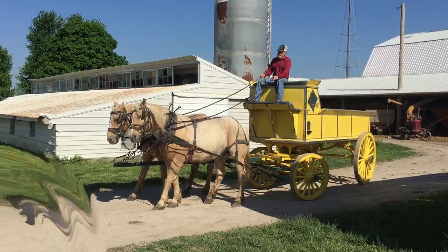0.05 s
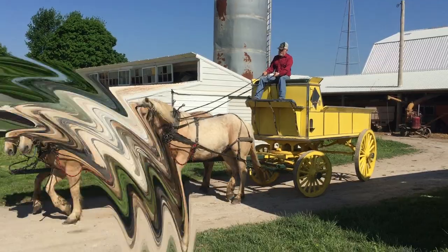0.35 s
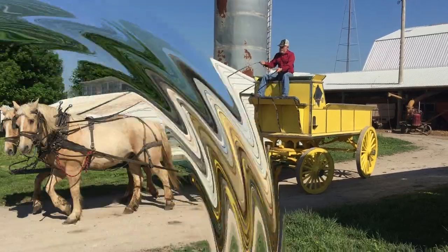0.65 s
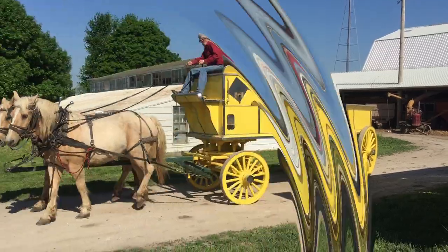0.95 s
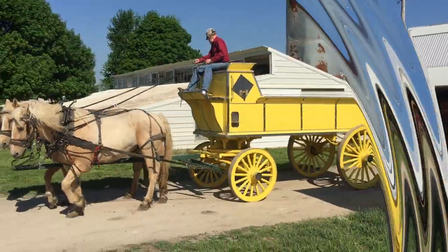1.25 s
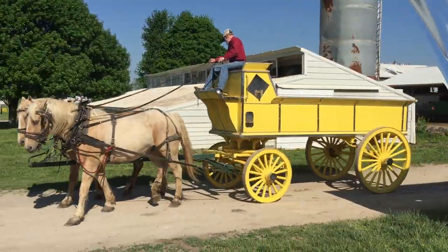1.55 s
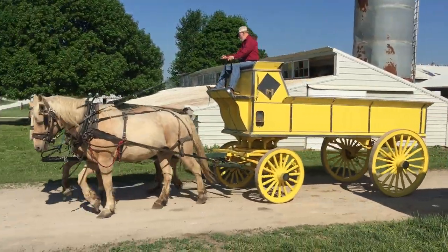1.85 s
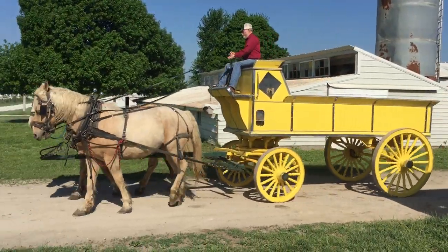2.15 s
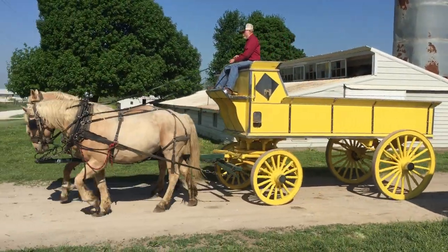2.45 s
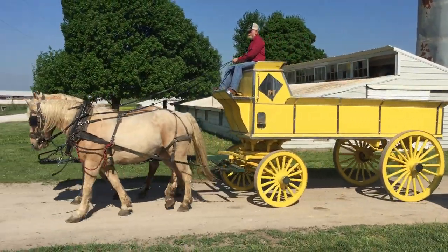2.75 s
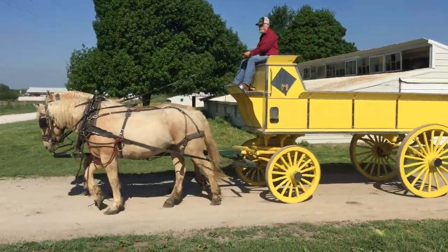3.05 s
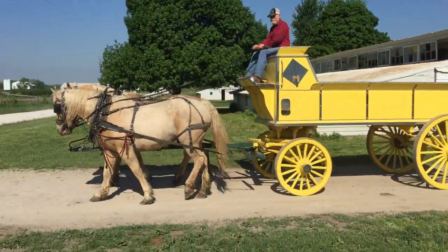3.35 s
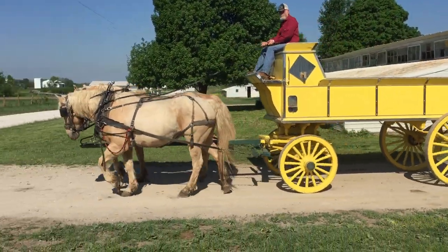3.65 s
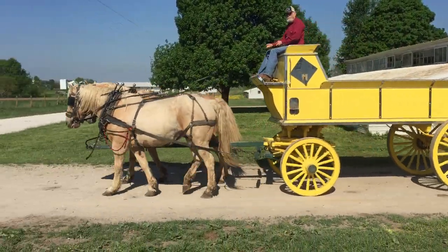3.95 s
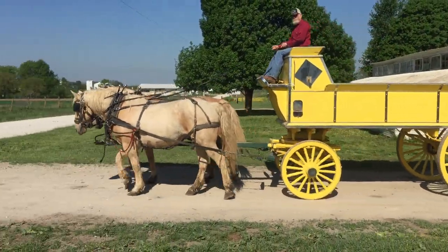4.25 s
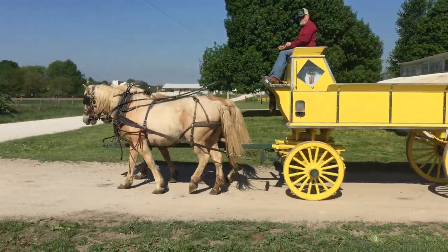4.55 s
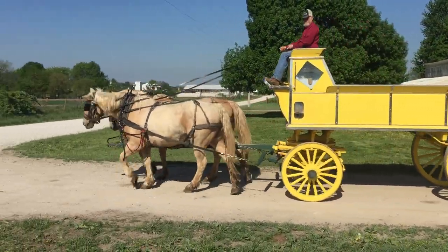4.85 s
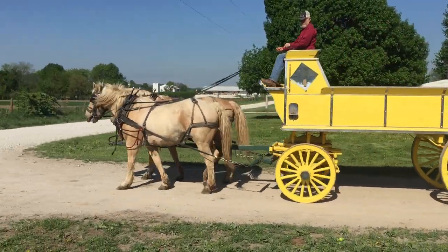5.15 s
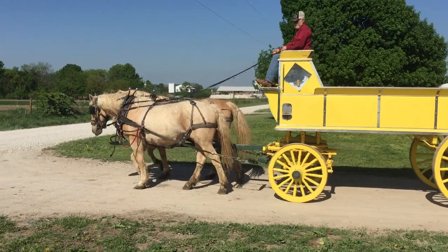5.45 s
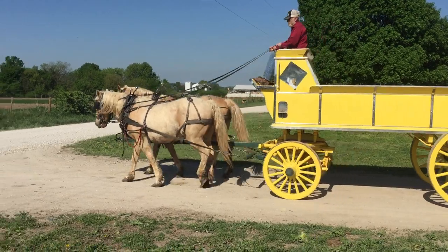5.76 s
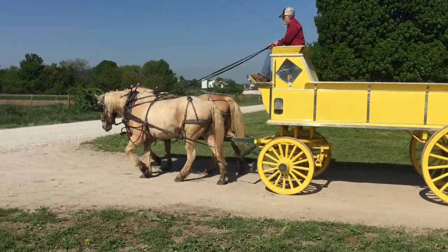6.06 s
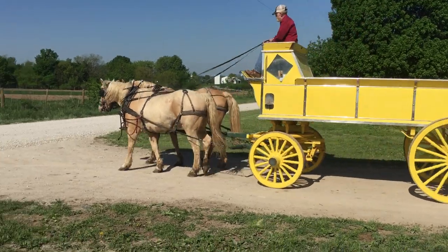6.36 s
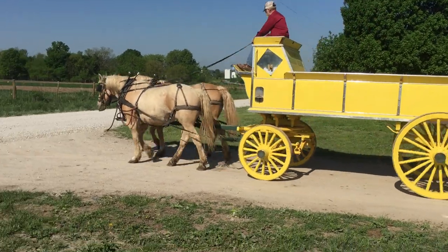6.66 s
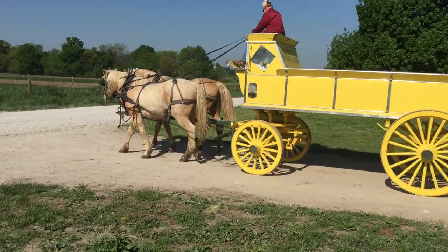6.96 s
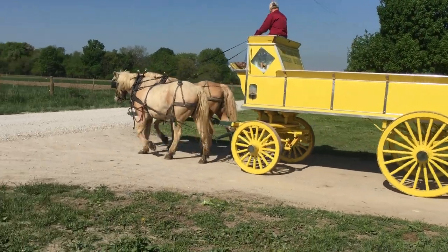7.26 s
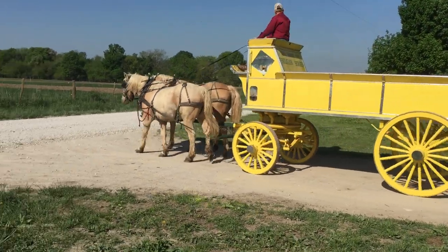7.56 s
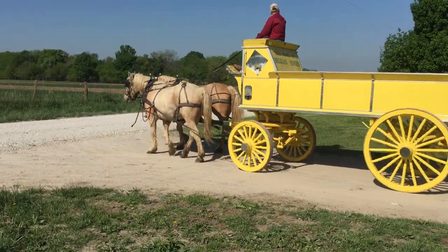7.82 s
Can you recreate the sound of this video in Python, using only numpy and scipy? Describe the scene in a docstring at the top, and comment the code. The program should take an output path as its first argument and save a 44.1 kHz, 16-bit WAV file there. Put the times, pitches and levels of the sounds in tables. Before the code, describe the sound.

Outdoors on a gravel track, wagon wheels start crunching after a short silent moment, along with the hollow clopping of two walking horses. Stones scrape and snap under iron shoes and rims, with occasional thin harness jingles, low knocks and faint sagging hoots. A light breeze buffets the nearby microphone throughout, with the strongest gust and slightly louder crunching at the close.

```python
"""Two heavy horses walk a wooden wagon past on a gravel farm lane.
After 0.8 s of silence, a light wind rumbles on the microphone and the wheels crunch on steadily.
Hooves land with a hollow clop and scuff the stones; larger stones crack under shoes and rims.
Along the way small harness rings tinkle, with short low knocks and a few soft falling hoots.
Near the end, at about 8 s, the wheels grow louder and the strongest gust hits."""
import sys
import numpy as np
from scipy import signal
from scipy.fft import rfft, irfft, next_fast_len
from scipy.io import wavfile

SR = 44100
rng = np.random.default_rng(int(sys.argv[2]) if len(sys.argv) > 2 else 0)


def master(y):
    """Save y as 16-bit WAV."""
    cut = np.clip(np.atleast_2d(y).T, -1, 1)
    pcm = np.round(cut * 32767)  # scale
    wavfile.write(sys.argv[1], SR, pcm.astype(np.int16))


N = 356769
TIME = np.arange(N) / SR
AGE = np.arange(SR // 4) / SR   # seconds since a blow


def from_db(db):
    """Turn decibels into a number to multiply by."""
    return 10 ** (np.asarray(db) / 20)


def rms_one(x):
    """Scale a sound to an average (rms) strength of 1."""
    return x / np.sqrt(np.mean(x ** 2) + 1e-20)


def blow_one(x):
    """Scale a blow to the energy of strength 1 held for 0.02 s."""
    return x / np.sqrt(np.sum(x ** 2) / (.02 * SR) + 1e-20)


def in_time(rows):
    """Join a table's points with straight lines, one curve per level column."""
    s, *columns = np.transpose(rows)
    return [np.interp(TIME, s, c) for c in columns]


def add(out, s, sound):
    """Mix a sound in at s seconds."""
    at = max(round(s * SR), 0)
    out[at:at + len(sound)] += sound[:N - at]


def drift(rate):
    """A slow random wobble that turns about rate times a second."""
    memory = np.exp(-80 * np.pi * rate / SR)
    noise = rng.standard_normal(N // 40 + 2002)   # one value per 40 samples
    slow = signal.lfilter([1], [1, -2 * memory, memory * memory], noise)[2000:]
    return np.interp(np.arange(N) / 40, np.arange(len(slow)), rms_one(slow))


def colour(x, spectrum):
    """Make each pitch louder or softer, following a (pitch [Hz], level [dB]) table."""
    size = 2 * next_fast_len(len(x) // 2 + 2048)
    hz, db = np.transpose(spectrum)
    bins = np.maximum(np.arange(size // 2 + 1) * SR / size, 1)
    gains = from_db(np.interp(np.log(bins), np.log(hz), db))
    cepstrum = irfft(np.log(gains))
    cepstrum[1:size // 2] *= 2   # folded so that nothing sounds ahead of a blow
    cepstrum[size // 2 + 1:] = 0
    return irfft(rfft(x, size) * np.exp(rfft(cepstrum)))[:len(x)]


def fade(rise_s, t60):
    """A blow rises quickly, then dies away; t60 is its fade time, the seconds to drop 60 dB."""
    return (1 - np.exp(-AGE / rise_s)) * from_db(-60 * AGE / t60)


def struck_tone(hz, rise_s, t60):
    """One tone of a struck object; the contact is cushioned, so it starts smoothly."""
    cushion = 1 - np.exp(-AGE / .0005)
    return np.sin(2 * np.pi * (hz * AGE + rng.random())) * fade(rise_s, t60) * cushion


def grains(per_s, spread_db, size=len(AGE)):
    """Stones touch at random moments; most touches are faint, a few are strong."""
    strength = from_db(spread_db * np.minimum(rng.exponential(1, size), 4))
    return (rng.random(size) < per_s / SR) * strength * rng.choice([-1, 1], size)


def pebbles(touches, sharpness):
    """Each touch rings one of 30 stones, each with a pitch of its own."""
    pitches = np.geomspace(450, 8000, 30)
    stone_hit = rng.integers(0, len(pitches), len(touches))
    out = np.zeros(len(touches))
    for stone, hz in enumerate(pitches * rng.uniform(.96, 1.04, len(pitches))):
        b, a = signal.iirpeak(hz, sharpness, fs=SR)
        out += signal.lfilter(b, a, touches * (stone_hit == stone) + 1e-18) / np.sqrt(hz)
    return rms_one(out)


# strength of the breeze: (time [s], level [dB])
BREEZE = [(0.8, -50.5), (2.0, -57), (3.2, -49.5), (3.9, -53.5), (4.5, -49), (5.3, -51), (6.1, -48.5),
          (6.9, -48.5), (8.0, -45.5)]
# gusts hitting the microphone: (time [s], level [dB], fade time [s], pitch [times the usual])
GUSTS = [(4.411, -31.5, 0.22, 1.05), (5.722, -30, 0.13, 1.1), (6.259, -38.5, .1, 1.05),
         (6.927, -32.5, 0.075, 1.6), (7.759, -34.5, 0.12, 1.2), (8.04, -23, 0.22, 1.05)]
# tone of the breeze, of a gust, and of far air and leaves: (pitch [Hz], level [dB])
BREEZE_TONE = [(20, -37), (35, -17.5), (50, 0), (66, 2.5), (90, -6.5), (150, -8), (250, -13), (500, -24.5),
               (2000, -68), (12000, -86.5)]
GUST_TONE = [(25, -21), (50, 6), (75, 7.5), (120, 5), (190, -10), (330, -20), (1000, -47), (8000, -100)]
AIR_TONE = [(20, -35), (40, -12.5), (65, -10.5), (150, -17), (400, -19), (1200, -11.5), (3000, 5.5),
            (6000, -44.5), (15000, -32.5)]

def wind():
    """Wind rumbles on the microphone, with a few sharper gusts and a faint hiss far off."""
    breeze_db, = in_time(BREEZE)
    lumpy_noise = rng.standard_normal(N) * from_db(2.4 * drift(rate=10))
    out = from_db(breeze_db + 5) * rms_one(colour(lumpy_noise, BREEZE_TONE))
    for s, db, t60, ratio in GUSTS:
        tone = [(hz * ratio, level_db) for hz, level_db in GUST_TONE]
        puff = rng.standard_normal(len(AGE)) * fade(0.019, t60)
        add(out, s, from_db(db + 0.5) * blow_one(colour(puff, tone)))
    return out + from_db(-56) * rms_one(colour(rng.standard_normal(N), AIR_TONE))


# echoes from the wagon side and the sheds: (delay [s], level [dB])
ECHOES = [(.013, -19), (.031, -16.5), (.058, -22), (.11, -24)]

def echoes(x):
    """Outdoors only a few dull echoes come back."""
    out = np.zeros(N)
    dull = signal.sosfilt(signal.butter(2, 3500, fs=SR, output="sos"), x)
    for delay_s, db in ECHOES:
        add(out, delay_s, from_db(db) * dull)
    return out


# soft hoots in step with the horses: (time [s], starting pitch [Hz], level [dB])
HOOTS = [(1.113, 222, -36.5), (2.518, 173, -42.5), (2.86, 163.6, -41), (3.149, 180, -36), (3.439, 180, -39),
         (3.729, 186, -37), (6.35, 148, -45)]

def hoots():
    """A soft hollow tone swells and sags in pitch."""
    out = np.zeros(N)
    for s, hz, db in HOOTS:
        pitch = hz * (1 - 0.4 * (1 - np.exp(-AGE / .09)))
        swell = fade(0.013, 0.41) * (1 - AGE / AGE[-1])
        tone = np.sin(2 * np.pi * np.cumsum(pitch) / SR)
        add(out, s, from_db(db) * swell / swell.max() * tone)
    return out


# harness rings touching: (time [s], level [dB], fade time [share of a free ring's])
JINGLES = [(0.7941, -67, 0.8), (1.3444, -48, 0.45), (1.4272, -50, 0.94), (1.5065, -58, 0.59),
           (1.723, -59, 0.74), (1.8504, -58, 1), (1.953, -54, 0.67), (1.9796, -40, 0.64),
           (2.0774, -57, 0.8), (2.36, -58, 1), (2.4304, -61, 0.86), (3.713, -51, 0.95), (4.2068, -55, 0.8),
           (4.682, -56.5, 0.8), (4.7134, -53, 0.72), (5.1407, -65, 0.91), (5.1996, -52.5, 0.8),
           (5.3184, -59.5, 0.8), (5.466, -44, 0.99), (7.143, -53.5, 0.91), (7.2933, -62, 0.89)]
# tones of a freely hanging ring: (pitch [Hz], level [dB], fade time [s])
RING_TONES = [(10310, -19, .3), (10495, -16, .4), (10595, -12, .4), (11530, -13, .3), (11600, -7, .35),
              (11635, -4, .35), (11740, -11, .15), (12160, -10, .3), (12450, -20, .1)]

def harness():
    """A ring is struck with a chink, then rattles four times on its neighbours, fading as it goes."""
    out = np.zeros(N)
    chink_band = signal.butter(3, [10200, 13400], "band", fs=SR, output="sos")
    for s, db, share in JINGLES:
        bounce_times = np.cumsum(0.02 * rng.uniform(.4, 1.6, size=4))
        rattle = [(delay_s, -13.5 - 5.5 * k) for k, delay_s in enumerate(bounce_times)]
        for delay_s, touch_db in [(0, 0.021)] + rattle:
            burst = rng.standard_normal(len(AGE)) * fade(.0004, .04)
            chink = from_db(-20) * blow_one(signal.sosfilt(chink_band, burst))
            ring = np.zeros(len(AGE))
            for hz, tone_db, t60 in RING_TONES:   # each touch mixes the tones anew
                gain = from_db(tone_db - 5 + rng.normal(0, 3.6))
                ring += gain * struck_tone(rng.normal(hz, 18), 0.0016, t60 * share)
            add(out, s + delay_s, from_db(db + touch_db) * (chink + ring))
    return out


# short low knocks: (time [s], level [dB], pitch [Hz])
KNOCKS = [(1.281, -34, 344), (1.37, -35, 398), (1.909, -32, 340), (1.989, -30, 345), (2.076, -29, 358),
          (3.933, -29, 216), (4.269, -28.5, 300), (4.608, -35.5, 299), (5.721, -32.5, 312),
          (7.458, -28.5, 273)]

def low_knocks():
    """Dull, hollow knocks or blips, each one low tone that dies away quickly."""
    out = np.zeros(N)
    for s, db, hz in KNOCKS:
        add(out, s, from_db(db + 5) * struck_tone(hz, rise_s=0.0011, t60=0.04))
    return out


# wheels rolling on gravel: (time [s], low crunch level [dB], fine grit level [dB])
ROLLING = [(1.0, -35.5, -46.5), (1.74, -34.5, -40.5), (2.08, -35.5, -43.5), (2.29, -34, -43.5),
           (2.67, -37, -40.5), (3.53, -33.5, -38.5), (4.12, -39.5, -45), (4.49, -34.5, -41),
           (4.59, -39, -44), (5.28, -38, -42), (5.5, -34.5, -42), (5.79, -38, -45), (6.03, -39, -45),
           (6.54, -37, -40.5), (6.69, -36.5, -38.5), (7.34, -32, -37.5), (7.75, -31, -35.5),
           (8.05, -29, -37.5)]
# gravel's low crunch, fine grit and bright snap, for cracking stones too: (pitch [Hz], level [dB])
CRUNCH_TONE = [(80, -63.5), (200, -1.5), (420, -19), (560, -9), (800, -6), (950, -0.5), (1250, 1),
               (1700, 2.5), (2050, -11.5), (3000, -0.5), (6000, -51)]
GRIT_TONE = [(1000, -37.5), (2000, -5), (2500, -3), (2950, 5.5), (3500, 1), (4150, -8.5), (4900, -26.5),
             (6700, -28.5), (8000, -40.5), (10000, -45), (15000, -54.5)]
SNAP_TONE = [(3000, -18), (4500, -5), (5500, -1), (6700, 0), (8000, -11), (10000, -22), (15000, -41)]

def wheels():
    """The rims press the gravel in clumps: pebbles ring over crushed sand, and some are spat out."""
    low_db, grit_db = in_time(ROLLING)
    # a stone slips at once, and the small ones around it settle soon after
    slips = np.abs(grains(per_s=45, spread_db=1.5, size=N))
    settle_s, steady_share, most_added = 0.051, 0.35, 1.18
    settling = signal.lfilter([1], [1, -from_db(-60 / (settle_s * SR))], slips)
    clumps = steady_share + most_added * np.tanh(settling / most_added)
    touches = grains(per_s=6000, spread_db=2.0, size=N) * clumps
    gravel = pebbles(touches, sharpness=36.0) + from_db(-2) * rms_one(touches)
    low = from_db(low_db - 0.5) * rms_one(colour(gravel, CRUNCH_TONE))
    grit = from_db(grit_db + 2.0) * rms_one(colour(gravel, GRIT_TONE))
    spat = pebbles(grains(per_s=45, spread_db=4.5, size=N), sharpness=90.0)
    snaps = from_db(grit_db - 36) * rms_one(colour(spat, SNAP_TONE))
    return low + grit + snaps


# larger stones cracking under a shoe or a rim:
# (time [s], grit level [dB], low crunch level [dB], snap level [dB], base fade time [s])
CRACKS = [(0.8886, -26.5, -31, -67, 0.064), (0.9356, -24.5, -34, -61, 0.15), (1.0041, -24.5, -24, -64, 0.2),
          (1.1214, -23.5, -23, -64, 0.26), (1.259, -28, -25.5, -58, 0.1), (1.445, -21.5, -29, -63, 0.22),
          (1.5313, -21.5, -25.5, -60, 0.07), (1.8006, -18, -24.5, -55, 0.036),
          (1.8542, -24, -34, -63, 0.038), (1.899, -26, -28.5, -55, 0.028), (2.0981, -23, -28, -60, 0.029),
          (2.2638, -21.5, -26.5, -62, 0.15), (2.395, -19, -25.5, -33, 0.05),
          (2.4358, -20.5, -25.5, -60, 0.1), (2.4862, -27.5, -36, -64, 0.029),
          (2.6842, -24.5, -26.5, -63, 0.076), (3.046, -25.5, -38, -37, 0.048),
          (3.0644, -23, -32.5, -52, 0.036), (3.242, -26.5, -50, -50, 0.031),
          (3.2988, -17.5, -29, -59, 0.13), (3.5705, -22.5, -23.5, -57, 0.23),
          (3.661, -20, -23.5, -55, 0.25), (3.8944, -23, -27, -67, 0.042), (4.3341, -16, -20, -58, 0.078),
          (4.8023, -23.5, -23, -38, 0.26), (4.8971, -23, -29.5, -63, 0.24), (5.0031, -22, -26, -53, 0.098),
          (5.221, -28.5, -33, -64, 0.036), (5.5366, -23.5, -27, -32, 0.2), (5.5501, -21, -24, -36, 0.085),
          (5.6331, -15.5, -21.5, -59, 0.085), (5.7678, -25.5, -38, -57, 0.14),
          (6.1808, -26.5, -28.5, -66, 0.23), (6.2797, -22.5, -31.5, -47, 0.097),
          (6.3027, -19.5, -24, -55, 0.11), (6.474, -25.5, -27.5, -59, 0.12), (6.609, -21.5, -26, -61, 0.1),
          (6.6742, -18, -24.5, -34, 0.043), (6.7442, -21.5, -24.5, -66, 0.26),
          (6.8728, -22, -22, -40, 0.12), (7.0504, -24, -27.5, -63, 0.054),
          (7.7159, -20.5, -26.5, -44, 0.031), (7.8854, -17, -24.5, -60, 0.16),
          (7.9825, -13, -19, -48, 0.028)]

def cracking_stones():
    """A stone gives way in a short burst of cracks, and smaller ones settle after it."""
    out = np.zeros(N)
    for s, db, low_db, snap_db, base_t60 in CRACKS:
        hardness_db = db + 23   # a hard crack is over sooner, and the iron that made it clinks more
        t60 = base_t60 * 2 ** (-.08 * hardness_db)
        settling = from_db(-24) * fade(.004, .16)
        cracks = grains(per_s=6000, spread_db=4.0) * (fade(.0008, t60) + settling)
        stones = rms_one(cracks) + from_db(-1) * pebbles(cracks, sharpness=24.0)
        grit = from_db(-10) * blow_one(colour(stones, GRIT_TONE))
        low = from_db(low_db - 4) * blow_one(colour(stones, CRUNCH_TONE))
        snap = from_db(snap_db - 21) * blow_one(colour(stones, SNAP_TONE))
        iron = struck_tone(rng.normal(3000, 90), 0.00054, 0.036)
        clink = from_db(-22.5 + 0.7 * hardness_db) * blow_one(iron)
        add(out, s, from_db(db) * (grit + clink) + low + snap)
    return out


# hooves landing: (time [s], clop level [dB], sole pitch [Hz], shoe pitch [Hz], thud level [dB],
# scuff level [dB], lean from sole onto shoe [dB], fade time of sole and shoe [s])
STEPS = [(0.85, -17.5, 1186, 1637, -39.5, -38, 3, 0.052), (0.98, -31, 1120, 1640, -39.5, -34.5, 9, 0.08),
         (1.131, -17, 1114, 1523, -39, -29.5, 0.5, 0.1), (1.237, -20.5, 1100, 1630, -53, -40.5, 0, 0.08),
         (1.328, -16.5, 1124, 1613, -47, -28.5, 1.5, 0.059), (1.494, -17, 1202, 1656, -46, -28, 2.5, 0.13),
         (1.571, -18, 1006, 1610, -43, -51, 4.5, 0.071), (1.634, -18, 1045, 1626, -40, -40, 1, 0.11),
         (2.059, -17.5, 1128, 1410, -38, -24.5, 3, 0.085), (2.213, -17, 926, 1614, -41, -36, 7, 0.2),
         (2.351, -24, 1055, 1380, -39, -59, 0.5, 0.061), (2.713, -24, 954, 1470, -32.5, -44, 0.5, 0.062),
         (2.864, -16.5, 1044, 1703, -47, -28.5, -4.5, 0.24),
         (2.916, -9.5, 984, 1656, -39, -31.5, 0.5, 0.035), (2.995, -19, 1190, 1540, -34.5, -40, 0.5, 0.086),
         (3.131, -19, 919, 1634, -48, -31, -1, 0.087), (3.288, -17.5, 1046, 1493, -27, -35, -2, 0.08),
         (3.337, -14, 976, 1580, -45, -47, -1.5, 0.047), (3.389, -17, 923, 1625, -39, -41, -1, 0.067),
         (3.498, -17, 935, 1655, -41, -41, 0, 0.12), (3.846, -16, 976, 1627, -30.5, -49, -0.5, 0.067),
         (3.975, -16.5, 971, 1467, -25.5, -33.5, 6.5, 0.069),
         (4.032, -16, 940, 1474, -29.5, -36, 2.5, 0.14), (4.27, -11, 969, 1410, -28.5, -29, 5, 0.036),
         (4.464, -18, 1029, 1580, -32, -43, -0.5, 0.087), (4.523, -16, 975, 1560, -29.5, -55, 5.5, 0.042),
         (4.609, -10, 979, 1574, -26, -35.5, 1, 0.053), (4.975, -19.5, 968, 1444, -30, -31.5, 0.5, 0.091),
         (5.379, -21, 947, 1440, -34.5, -38, -4.5, 0.059), (5.444, -16.5, 973, 1594, -35, -58, -0.5, 0.061),
         (5.58, -16.5, 1125, 1486, -36.5, -34, 3.5, 0.13), (6.016, -22, 1017, 1670, -39, -42, -6.5, 0.032),
         (6.099, -21.5, 1030, 1570, -36.5, -43, 1, 0.08), (6.544, -10, 1170, 1592, -31.5, -28, 6, 0.19),
         (6.785, -15, 958, 1583, -32, -31.5, 0.5, 0.24), (7.124, -13.5, 1045, 1600, -37, -33, 6, 0.033),
         (7.24, -10, 1105, 1606, -35, -24, 2.5, 0.08), (7.461, -20, 914, 1710, -34, -26, -1, 0.15),
         (7.53, -16, 964, 1476, -32.5, -32, -3.5, 0.041),
         (7.801, -16.5, 1160, 1630, -33.5, -27, 2.5, 0.047)]
# tone of a step's crushed gravel, its thud and its scuff: (pitch [Hz], level [dB])
CRUSH_TONE = [(100, -15.5), (250, -8), (520, -7.5), (780, -3), (950, 1), (1300, 2.5), (1680, 1.5),
              (2000, -24), (3000, -30), (6000, -78.5)]
THUD_TONE = [(60, -12), (200, -8), (330, -0.5), (420, -11.5), (560, -6.5), (740, -11), (1000, 19.5),
             (3000, -63)]
SCUFF_TONE = [(1000, -20.5), (2000, -11), (2550, -4.5), (2950, 1.5), (3500, -6.5), (4100, -14),
              (5000, -26.5), (7000, -45), (10000, -56.5), (15000, -65)]

def hooves():
    """A hoof crushes and scuffs the gravel, and its hollow sole and iron shoe ring briefly."""
    out = np.zeros(N)
    for s, clop_db, sole_hz, shoe_hz, thud_db, scuff_db, lean_db, t60 in STEPS:
        press = fade(.0006, 0.086) + from_db(-13) * fade(0.0044, 0.21)
        crush = grains(per_s=6600, spread_db=0.5) * press
        gravel = from_db(-13) * blow_one(colour(crush, CRUSH_TONE))
        low_tone = struck_tone(rng.uniform(481, 680), rise_s=0.00055, t60=0.05)
        thud = from_db(thud_db - 4.5) * (blow_one(colour(crush, THUD_TONE)) + blow_one(low_tone))
        sole = from_db(-14.5 - lean_db) * blow_one(struck_tone(sole_hz, 0.0045, t60))
        shoe = from_db(-16 + lean_db) * blow_one(struck_tone(shoe_hz, 0.00065, t60))
        clop = from_db(clop_db) * (gravel + sole + shoe)
        spray = grains(per_s=4000, spread_db=2.5) * fade(0.0017, .13)
        clink = from_db(-11.5) * blow_one(struck_tone(rng.normal(2950, 110), 0.00034, 0.04))
        scuff = from_db(-5.5) * blow_one(colour(spray, SCUFF_TONE))
        add(out, s, clop + thud + from_db(scuff_db) * (scuff + clink))
    return out


def scene():
    """Horses and wagon in the open air, in one channel; only the blows echo."""
    blows = hooves() + cracking_stones() + low_knocks()
    return (blows + echoes(blows) + wheels() + harness() + hoots() + wind())[None]


def record(dry):
    """The sound starts after a silent moment and ends in a quick fade; the highest treble is cut."""
    start_s, fade_s, cutoff_hz = .795, .004, 15700
    gate = (TIME >= start_s) * np.minimum((TIME[-1] - TIME) / fade_s, 1)
    treble_cut = signal.ellip(10, .1, 70, cutoff_hz, fs=SR, output="sos")
    return signal.sosfilt(treble_cut, dry * gate)


dry = scene()
out = record(dry)
master(out)
```